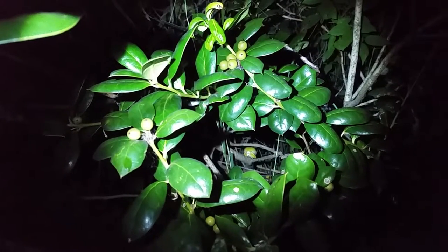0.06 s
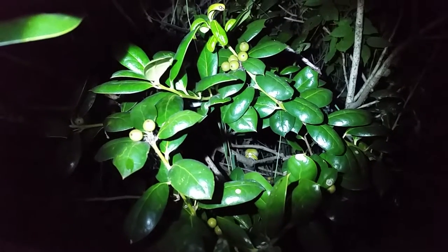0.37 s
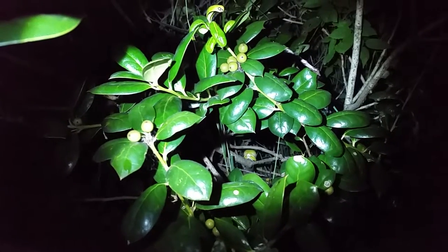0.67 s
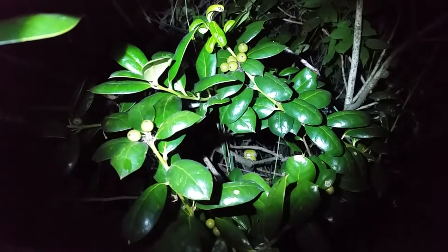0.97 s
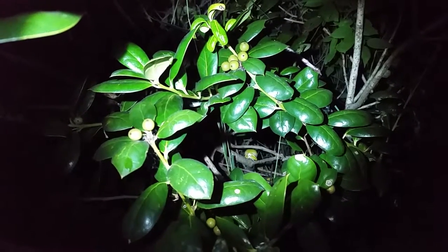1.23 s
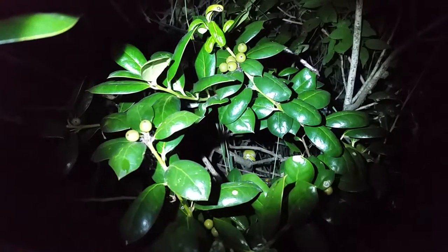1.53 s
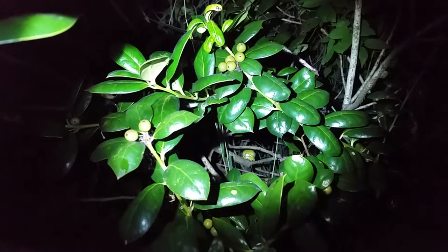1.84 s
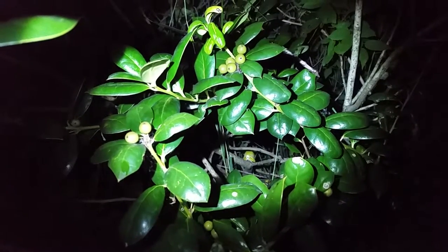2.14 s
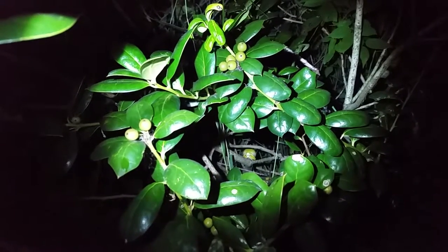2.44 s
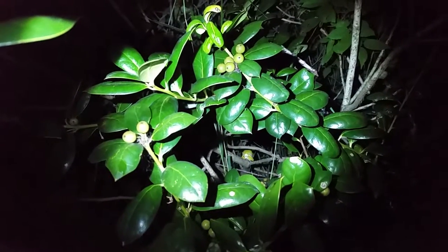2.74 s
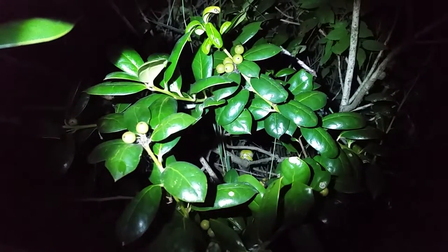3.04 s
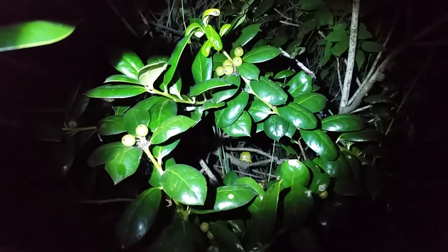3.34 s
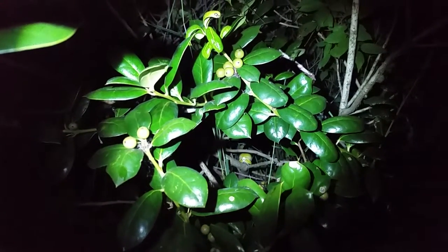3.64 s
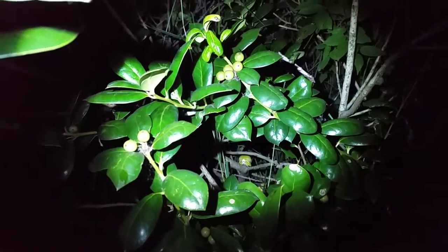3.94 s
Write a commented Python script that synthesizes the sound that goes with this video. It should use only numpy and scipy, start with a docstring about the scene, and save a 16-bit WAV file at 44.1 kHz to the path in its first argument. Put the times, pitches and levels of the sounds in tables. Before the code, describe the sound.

Repeated raspy tree frog barks, with high insect buzzing and faint distant traffic behind.

```python
"""Tree frog at night

A tree frog barks from a bush: each bark is a train of clicks ringing its throat and vocal sac.
Three katydids scrape their wings in the leaves, the nearest pausing about once a second.
Far traffic drones, the air hisses, something taps once. Gain control ducks under every bark."""
import sys
import numpy as np
from scipy import signal
from scipy.fft import rfft, irfft
from scipy.io import wavfile
from scipy.ndimage import uniform_filter1d, minimum_filter1d, map_coordinates

SR = 44100
rng = np.random.default_rng(int(sys.argv[2]) if len(sys.argv) > 2 else 0)


def master_out(mix):
    """Clip the mix to full scale and print it as 16-bit PCM to the path in sys.argv[1]."""
    frames = np.transpose(np.atleast_2d(mix))
    ceiling = np.clip(frames, -1, 1)
    pcm = np.round(ceiling * 32767).astype(np.int16)
    wavfile.write(sys.argv[1], SR, pcm)


N = 176400
TIME_S = np.arange(N) / SR
HZ = np.fft.rfftfreq(2 ** 18, 1 / SR)

# Frog barks. Each row: start in seconds, length in seconds, relative level in dB, mid-bark pitch in Hz.
BARK_EVENTS = [(-.0507, 0.11, 1.5, 283.9), (0.5141, 0.11, 0.5, 284.5), (1.1029, 0.11, 0.5, 283.8),
               (1.6587, 0.11, 0, 284.3), (2.1268, 0.1, 0.4, 283.2), (2.725, 0.11, -0.5, 284.2),
               (3.3058, 0.10146, -.5, 283.3), (3.781, 0.1, 0, 283.2)]
# Course of a bark. Each row: share of its length, then throat, sac, overtone and sizzle gains in dB.
BARK_COURSE = [(0, -7, -25, -13, -17), (.065, 0.5, -8, -11.5, -13), (.23, 3.5, -2.5, -0.5, -4),
               (.32, 4, 0, 1.5, -2.5), (.57, -1, -2.5, 4.5, 1.5), (.82, -4.5, -6, -3, -0.5),
               (1, -2.5, -9, -6.5, -2.5)]
# Resonances of a click. Each row: frequency in Hz, gain in dB.
THROAT_DB = [(300, -68), (570, -37.5), (720, -17.5), (840, 1.5), (1135, -4), (1415, -11), (1850, -14),
             (2200, -31.5), (4000, -73)]
SAC_DB = [(1500, -45), (2250, -18), (2550, -6), (2850, 8), (3100, 6.5), (3380, 4), (3650, -30), (5000, -90)]
OVERTONES_DB = [(3200, -44), (3700, -20), (3950, -7), (4500, -18), (5620, -27.5), (7000, -60)]
SIZZLE_DB = [(5000, -52), (6900, -20.5), (8000, -36.5), (14000, -53)]
# Closing tone of a bark. Each row: harmonic number, relative level in dB.
RELEASE_HARMONICS = [(1, -1.5), (2, -4.5), (4, 0.5)]
# Frog's stereo balance. Each row: frequency in Hz, left minus right in dB.
FROG_PAN_DB = [(850, -4), (1900, 0), (2800, 7), (3100, 4), (3400, 6.5), (3750, 1), (4450, -3), (4850, 8),
               (7000, 11)]
# Frog's stereo phase. Each row: frequency in Hz, left lead in radians.
FROG_LEAD_RAD = [(2600, -0.33), (3200, -1.13), (4700, -0.86)]
# Katydid strokes. Each holds: rate in Hz, decay in seconds (negative: a trace of growth), gain of every
# other stroke in dB, level in dB, left minus right in dB, stereo correlation (clipped to -1..1).
NEAR_STROKES = (232.5, -1, -4, -24, -11, 0.2)
LOW_STROKES = (67.5, -9, 2, -29, -5, 1.2)
BRIGHT_STROKES = (108, -1.8, 5, -37, -12.5, -1.2)
# Wing resonances. Each row: frequency in Hz, relative gain in dB.
NEAR_WING_DB = [(8500, -47), (9700, -6.5), (10150, -4), (10650, -1.5), (10950, -5), (11100, 6.5),
                (11270, -5), (11650, -3), (12200, -18), (15500, -35)]
LOW_WING_DB = [(7000, -52), (8200, -14.5), (9000, 2), (9400, 4.5), (9750, -3), (10300, -5.5), (11500, -16),
               (13000, -9.5), (15500, -41)]
BRIGHT_WING_DB = [(7500, -58), (9500, -2), (11300, -3), (12000, -0.5), (12400, -3), (13200, 0.5),
                  (13800, -10), (15600, -16)]
# Nearest katydid's pauses. Each row: start in seconds, length in seconds.
PAUSES_S = [(0.467, 0.035), (1.456, 0.027), (2.411, .035), (3.39, .03)]
# Far engine. Each row: time in seconds, pitch in Hz, level in dB.
ENGINE_COURSE = [(0, 83.9, -36.5), (.7, 83.9, -34), (.9, 85.97, -53), (1.45, 82, -51), (1.85, 82.7, -33),
                 (2.862, 82, -38.5), (3.35, 78.5, -35), (4, 74, -41)]
# Traffic tones. Each row: frequency in Hz, level in dB before wavering and fading.
TRAFFIC_TONES = [(207, -45.5), (230, -44.5)]
# Noise spectra of traffic, air and tap. Each row: frequency in Hz, relative gain in dB.
RUMBLE_SHAPE_DB = [(20, -24.5), (55, -7.5), (100, -2.5), (135, -5), (235, -6.5), (430, -25.5), (800, -61)]
AIR_SHAPE_DB = [(250, -22), (560, -6.5), (2200, -14.5), (4100, -5), (6400, -20.5), (9000, -21)]
TAP_SHAPE_DB = [(150, -6), (430, -8.5), (700, -21), (4200, -26), (7000, -47)]


def amp(db):
    """Decibels to gain."""
    return 10 ** (np.asarray(db) / 20)


def unit(x):
    """Scale to rms 1."""
    return x / np.sqrt(np.mean(x ** 2) + 1e-20)


def along(points, hz):
    """Interpolate (Hz, value) points on a log axis."""
    knots_hz, values = np.transpose(points)
    return np.interp(np.log(hz + 1), np.log(np.sort(knots_hz) + 1), values)


def wobble(rate_hz):
    """Smooth random curve, rate_hz knots a second."""
    return map_coordinates(rng.standard_normal(int(N * rate_hz / SR) + 4), [TIME_S * rate_hz])


def filtered(x, response):
    """Apply a response given on HZ."""
    return irfft(rfft(x, 2 * (len(HZ) - 1)) * response)[..., :N]


def causal(gain):
    """Minimum-phase response: sharp start, then ringing."""
    cepstrum = irfft(np.log(gain + 1e-6))
    half = cepstrum.shape[-1] // 2
    cepstrum[..., 1:half] *= 2
    cepstrum[..., half + 1:] = 0
    return np.exp(rfft(cepstrum))


def pan(db):
    """Left and right gains for a level difference."""
    return amp(np.array([[1], [-1]]) * db / 2)


def lead(radians):
    """Left and right responses for a phase difference."""
    return np.exp(.5j * np.array([[1], [-1]]) * radians)


def noise_pair(correlation):
    """Stereo white noise."""
    mid, side = rng.standard_normal((2, N))
    angle = np.arccos(np.clip(correlation, -1, 1)) / 2
    return np.cos(angle) * mid + np.sin(angle) * side * np.array([[1], [-1]])


def bark(length_s, pitch_hz, slow_hz=150.74, sag_hz_per_s=174, fill_s=0.029, sharpness=0.94, size=1024):
    """Click times and spectra: slow clicks jump to pitch, then sag as the air runs out."""
    t = np.arange(int(length_s * SR)) / SR
    fast_hz = pitch_hz - sag_hz_per_s * (t - length_s / 2)
    jump_s, jump_width_s = 0.019, 0.00194
    rate_hz = slow_hz + (fast_hz - slow_hz) / (1 + np.exp((jump_s - t) / jump_width_s))
    cycles = np.cumsum(rate_hz) / SR
    clicks_s = np.interp(np.arange(int(cycles[-1]) + 1), cycles, t)
    share, *courses_db = np.transpose(BARK_COURSE)
    throat_db, sac_db, overtones_db, sizzle_db = [
        np.interp(clicks_s / clicks_s[-1], share, db)[:, None] for db in courses_db]
    sac_tuning = 1.02 - 0.16 * np.exp(-clicks_s[:, None] / fill_s)  # rises as the sac fills
    hz = np.fft.rfftfreq(size, 1 / SR)
    gain = (amp(throat_db + along(THROAT_DB, hz))
            + amp(sac_db + along(SAC_DB, hz / sac_tuning))
            + amp(overtones_db + along(OVERTONES_DB, hz))
            + amp(sizzle_db + along(SIZZLE_DB, hz)))
    spectra = causal(gain ** sharpness) * gain ** (1 - sharpness)  # brief swell before the ring
    margin_s = size / 8 / SR  # room for that swell
    return clicks_s - margin_s, hz, spectra * np.exp(-2j * np.pi * hz * margin_s)


def whistle(pitch_hz=13650, fall_hz_per_s=30000, peak_s=0.076, rise_s=0.055, fade_s=0.012):
    """Faint, thin whistle that swells and falls in pitch while the frog pushes."""
    t = TIME_S[:SR // 7] - peak_s
    phase = 2 * np.pi * np.cumsum(pitch_hz - fall_hz_per_s * t) / SR + 1.1 * wobble(616)[:len(t)]
    envelope = np.exp(-(t / np.where(t < 0, rise_s, fade_s)) ** 2)
    return amp(-47) * envelope * np.sin(phase)


def release(pitch_hz=786.7, fall_hz_per_s=5070, rise_s=0.005):
    """After the last click the slackening folds give a brief, rough, falling tone."""
    t = TIME_S[:SR // 20]
    phase = 2 * np.pi * np.cumsum(pitch_hz - fall_hz_per_s * t) / SR + 0.4 * wobble(625)[:len(t)]
    envelope = t / rise_s * np.exp(1 - t / rise_s)
    return amp(-27.5) * envelope * sum(amp(db) * np.sin(round(k) * phase) for k, db in RELEASE_HARMONICS)


def frog(gain_db=20, jitter_s=4e-6, scatter_db=.5, rasp_db=-26, rasp_corner_hz=3650):
    """Uneven, raspy clicks ring throat and sac; each bark adds a whistle and a closing tone."""
    track = np.zeros(N + 2 * SR)  # 1 s of padding at each end
    for start_s, length_s, db, pitch_hz in BARK_EVENTS:
        clicks_s, hz, spectra = bark(length_s, pitch_hz)
        rasp_gain = amp(rasp_db) * (1 + (hz / rasp_corner_hz) ** 2)
        draws = rng.standard_normal((64, 130))
        for click_s, spectrum, (late, loud, *noise) in zip(clicks_s, spectra, draws):
            sample, fraction = divmod((1 + start_s + click_s + jitter_s * late) * SR, 0.99968)
            impulse = np.exp(-2j * np.pi * hz * fraction / SR)
            rasp = rasp_gain * rfft(noise, 2 * len(hz) - 2) / np.sqrt(len(noise))
            ring = irfft(spectrum * (impulse + rasp))
            track[int(sample):][:len(ring)] += amp(gain_db + db + scatter_db * loud) * ring
        for onset_s, tone in (start_s, whistle()), (start_s + length_s, release()):
            track[int((1 + onset_s) * SR):][:len(tone)] += amp(db) * tone
    return filtered(track[SR:][:N], pan(along(FROG_PAN_DB, HZ)) * lead(along(FROG_LEAD_RAD, HZ)))


def leaves(x, spread_s, gain_db, count=14, corner_hz=5940):
    """Sound plus early reflections from leaves, which scatter only treble."""
    reflections = np.zeros((2, SR // 2))
    for channel in reflections:
        signs = rng.choice([-1, 1], count)
        channel[(rng.random(count) * spread_s * SR).astype(int)] = signs / np.sqrt(count)
    treble = 1 / (1 + (corner_hz / (HZ + 1)) ** 5)
    return x + amp(gain_db) * filtered(signal.fftconvolve(x, reflections, axes=1)[:, :N], treble)


def woods(x, echo_s=0.057, echo_db=-36.5, tail_db=-27.5, t60_s=0.69):
    """Faint echo from the trees and a diffuse tail."""
    tail = rng.standard_normal((2, SR)) * amp(-60 * TIME_S[:SR] / t60_s)
    tail /= np.linalg.norm(tail[0])
    echo = filtered(x, np.exp(-2j * np.pi * HZ * echo_s))
    return amp(tail_db) * signal.fftconvolve(x, tail, axes=1)[:, :N] + amp(echo_db) * echo


def katydid(strokes, wing_db, drift_hz=0, tonal_share=.15, highpass_hz=7000):
    """Strong and weak strokes scrape the file and ring the wing; part of each scrape repeats."""
    rate_hz, decay_s, alternate_db, level_db, pan_db, correlation = strokes
    cycles = np.cumsum(rate_hz + drift_hz + .003 * rate_hz * wobble(25)) / SR
    age_s = cycles % 1 / rate_hz
    envelope = np.exp(-age_s / decay_s) * amp(alternate_db * (np.floor(cycles) % 2))
    teeth = map_coordinates(rng.standard_normal(2048), [age_s * SR], mode="wrap")
    scrape = np.sqrt(tonal_share) * teeth + np.sqrt(1 - tonal_share) * noise_pair(correlation)
    highpass = 1 / (1 + (highpass_hz / (HZ + 1)) ** 12)
    wing = lead(radians=-1.45) * causal(highpass * amp(along(wing_db, HZ)))
    return amp(level_db) * pan(pan_db) * unit(filtered(envelope * scrape, wing))


def insects(pause_db=-55, restart_db=-4.5, recover_s=0.12, slowing_hz_per_s=8, fade_db_per_s=0.52):
    """Two katydids buzz nonstop; the nearest pauses, swells back and slows through each bout."""
    bout_s, gate_db = TIME_S + .5, np.zeros(N)
    for start_s, length_s in PAUSES_S:
        end_s = start_s + length_s
        bout_s = np.where(TIME_S > end_s, TIME_S - end_s, bout_s)
        gate_db += pause_db * ((TIME_S > start_s) & (TIME_S < end_s))
    gain = amp(gate_db + restart_db * np.exp(-bout_s / recover_s) - fade_db_per_s * (TIME_S + 1.5))
    near = katydid(NEAR_STROKES, NEAR_WING_DB, drift_hz=slowing_hz_per_s * (.5 - bout_s))
    near *= uniform_filter1d(gain, size=300)
    return near + katydid(LOW_STROKES, LOW_WING_DB) + katydid(BRIGHT_STROKES, BRIGHT_WING_DB)


def traffic(octave_db=-10.5, rumble_db=-34, fade_db_per_s=1.7):
    """One far engine slows; rumble and wavering tones fade."""
    knots_s, pitch_hz, level_db = np.transpose(ENGINE_COURSE)
    phase = 2 * np.pi * np.cumsum(np.interp(TIME_S, knots_s, pitch_hz) + .5 * wobble(8.7)) / SR
    engine_gain = amp(np.interp(TIME_S, knots_s, level_db) + wobble(5.34))
    engine = engine_gain * (np.sin(phase) + amp(octave_db) * np.sin(2 * phase))
    tones = sum(amp(db + 3.1 * wobble(5.07)) * np.sin(2 * np.pi * hz * TIME_S + 1.72 * wobble(8))
                for hz, db in TRAFFIC_TONES)
    rumble = amp(rumble_db) * unit(filtered(noise_pair(0.8935), amp(along(RUMBLE_SHAPE_DB, HZ))))
    fade = amp(-fade_db_per_s * TIME_S)
    return pan(-0.86) * (np.sqrt(2) * engine + fade * (rumble + np.sqrt(2) * tones))


def air(level_db=-50):
    """Faint night hiss."""
    return amp(level_db) * unit(filtered(noise_pair(0.044), amp(along(AIR_SHAPE_DB, HZ))))


def tap(start_s=2.565, gain_db=-1.5, t60_s=0.047):
    """One soft, dull tap close by."""
    age_s = TIME_S - start_s
    burst = (age_s > 0) * amp(-60 * np.abs(age_s) / t60_s) * noise_pair(0.2)
    return amp(gain_db) * filtered(burst, causal(amp(along(TAP_SHAPE_DB, HZ))))


def scene():
    """Frog among leaves and trees, over insects, traffic, hiss and a tap."""
    voice = leaves(frog(), spread_s=.007, gain_db=10)
    reverb = woods(voice)
    chorus = leaves(insects(), spread_s=.014, gain_db=-8)
    return voice + reverb + chorus + traffic() + air() + tap()


def record(dry, threshold_db=-12.5, cut_db_per_db=0.38, hold_s=0.004, smooth_s=0.0054, top_hz=15750):
    """Gain control turns loud peaks down; a low-pass limits the band."""
    peak_db = 20 * np.log10(np.abs(dry).max(axis=0) + 1e-9)
    over_db = np.maximum(peak_db - threshold_db, 0)
    held_db = minimum_filter1d(-cut_db_per_db * over_db, int(hold_s * SR) + 1)
    gain_db = uniform_filter1d(held_db, int(smooth_s * SR) + 1)
    return filtered(dry * amp(gain_db), HZ < top_hz)


dry = scene()
out = record(dry)
master_out(out)
```